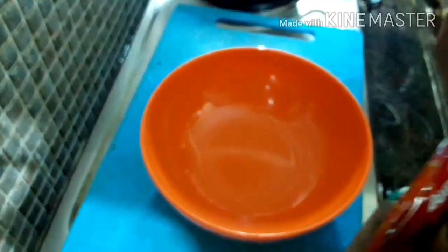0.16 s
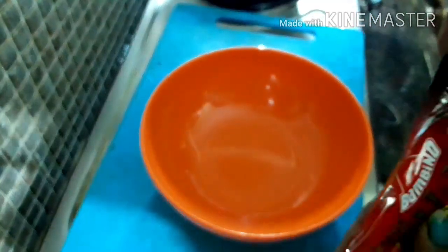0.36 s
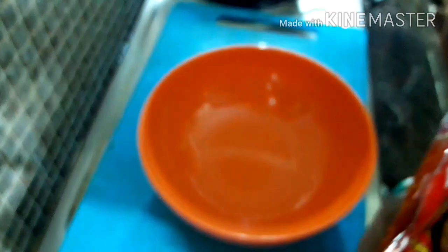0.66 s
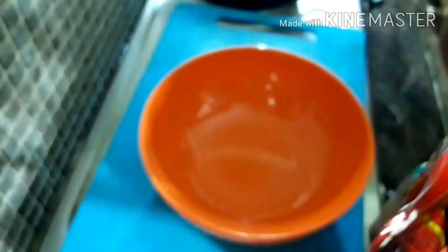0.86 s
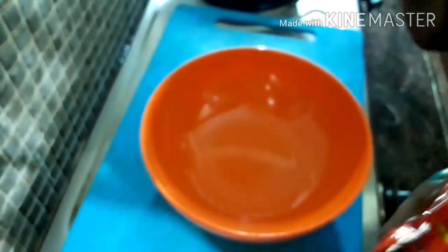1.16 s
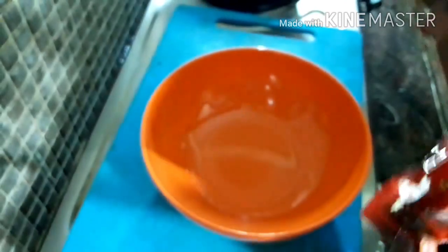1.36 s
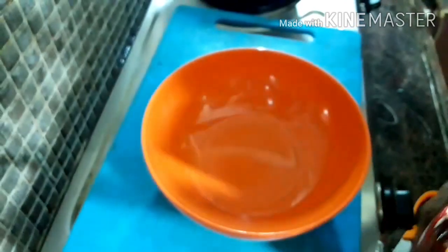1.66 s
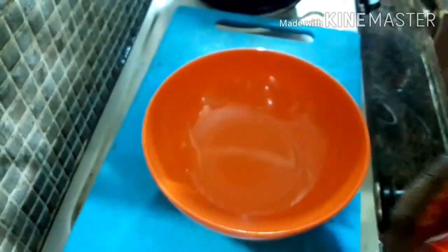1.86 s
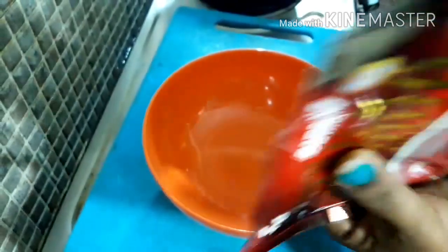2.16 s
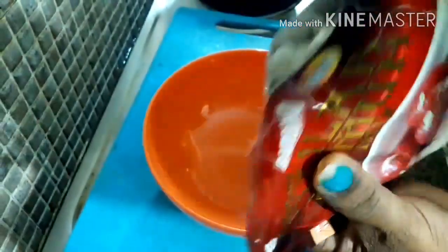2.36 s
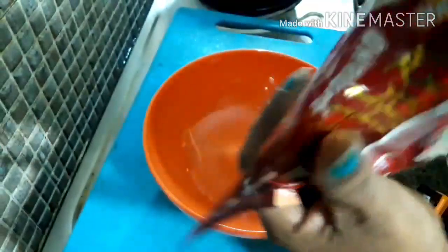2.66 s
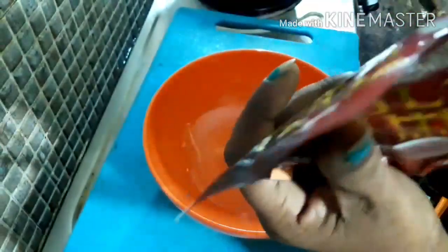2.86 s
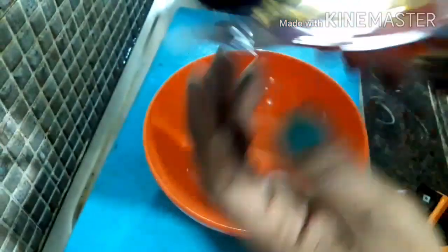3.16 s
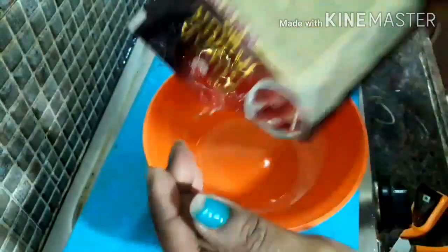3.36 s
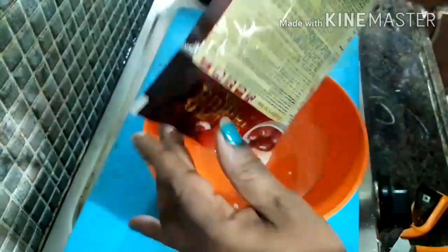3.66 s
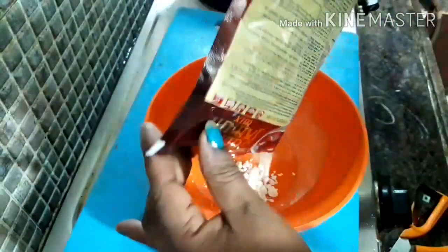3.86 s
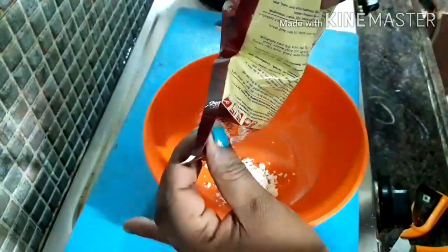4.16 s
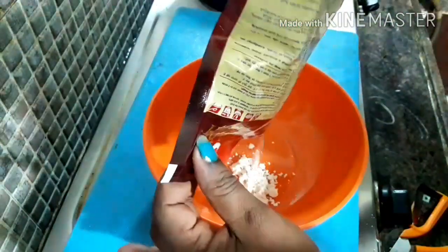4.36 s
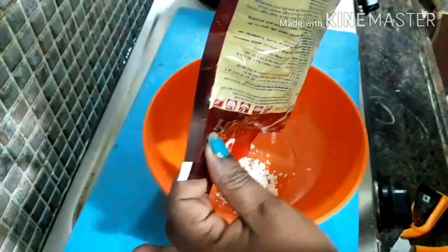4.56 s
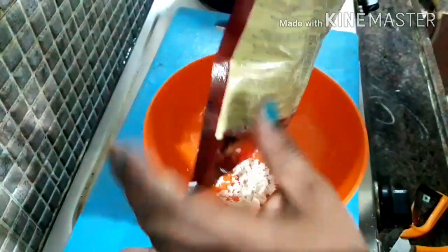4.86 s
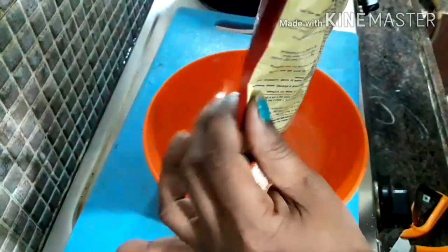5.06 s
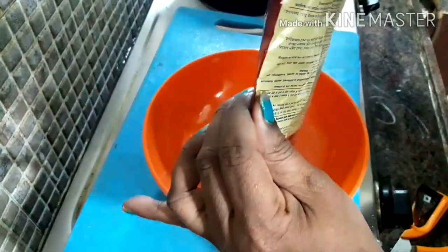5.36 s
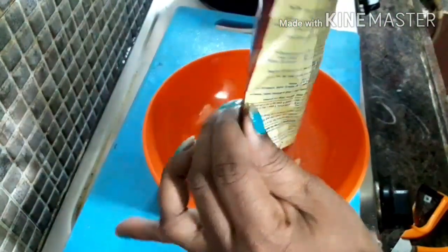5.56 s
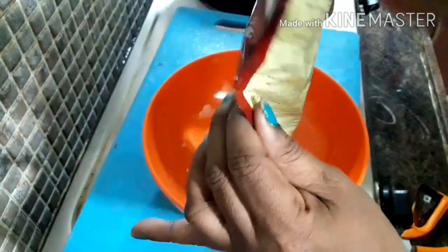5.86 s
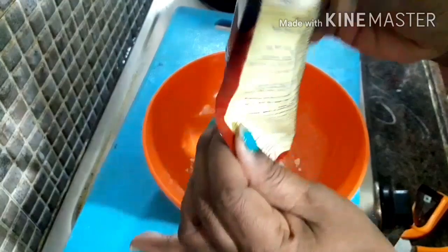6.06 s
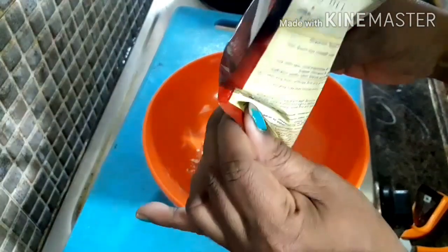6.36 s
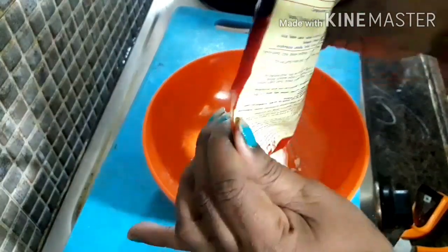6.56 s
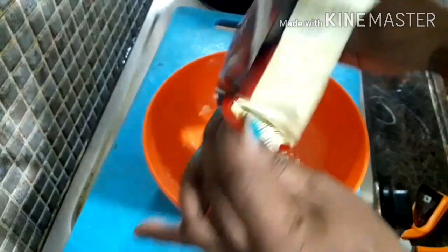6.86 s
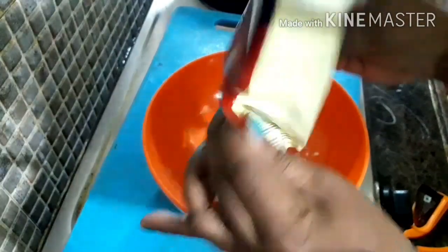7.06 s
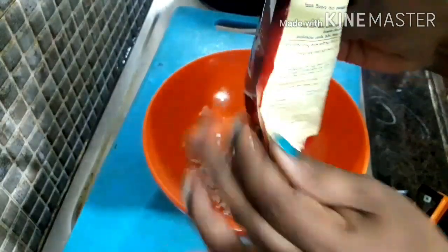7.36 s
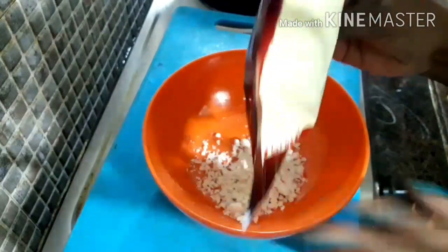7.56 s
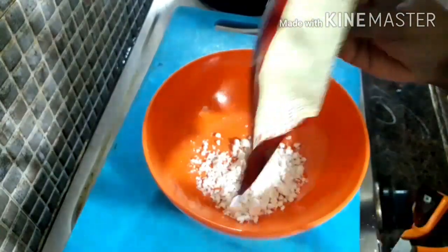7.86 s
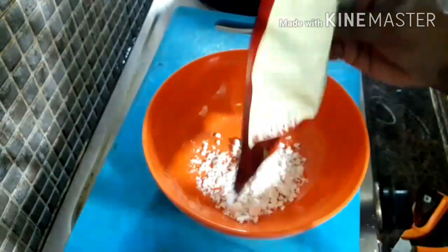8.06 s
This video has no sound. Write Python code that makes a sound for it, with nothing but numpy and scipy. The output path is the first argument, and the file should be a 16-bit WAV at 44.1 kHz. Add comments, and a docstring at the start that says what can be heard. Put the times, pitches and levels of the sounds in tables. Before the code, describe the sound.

A close mono pickup in a small, hard-surfaced kitchen with very faint air noise. After near quiet with slight hand rustle, a foil-lined packet creaks at 0.3 s and cracks brightly at 0.57-0.75 s, its seal ripping in two tiny bursts over low soft flops. A pause, then duller crinkles cluster at 1.2-1.5 s. A faint tap on the bowl at 1.8 s, a few crinkles near 2.1 s, then looser crackling from 2.7 to 3.5 s. At 3.87 s a lump of powder hits the plastic bowl with a hollow, low, quickly damped thud, and a soft low bump follows at 4.15 s. Crinkles stay sparse until 5 s, then snap at 5.1 and 5.3 s and thicken from 5.5 s. Crisp squeezing bursts peak at 6.3-7.4 s, with short echoes. It drops to near silence, with a slight bowl tap at 7.7 s and a soft flop and weak crinkle at 7.9 s.

```python
"""Crinkling packet over a plastic bowl

A foil-lined plastic packet is tugged open, then squeezed and shaken over a plastic bowl on a kitchen worktop.
Creases are bursts of tiny slips ringing the film; wrinkles and the tearing seal are random clicks.
The slack packet flops as short low notes. A lump of powder thuds into the bowl, which also takes lighter
knocks; both are sums of fading sines. Random echoes make a small hard room, with faint air noise, in mono.
"""
import sys
import numpy as np
from scipy import signal
from scipy.fft import rfft, irfft
from scipy.io import wavfile

SR = 44100
rng = np.random.default_rng(int(sys.argv[2]) if len(sys.argv) > 2 else 0)


def output_pcm(signal):
    """Save a mono or channel-first signal as 16-bit PCM at the path in sys.argv[1].

    Samples are clipped to [-1, 1] before scaling.
    """
    pcm = np.clip(np.atleast_2d(signal).T, -1, 1) * 32767
    wavfile.write(sys.argv[1], SR, np.round(pcm).astype(np.int16))


N = 361752

# the larger creases snapping through: start_s, panel_ring_db, crack_db (both over 5 ms), panel_pitch_hz
CREASES = [(0.3341, -36.5, -31.5, 2460), (0.518, -33.5, -33, 2200), (0.575, -29, -21, 2980),
           (0.5795, -20, -14, 2530), (0.667, -22, -16, 3840), (0.716, -30.5, -26.5, 3580),
           (0.74, -32, -29.5, 2980), (1.08, -36.5, -49, 2100), (1.198, -41, -57, 3200),
           (1.23, -30, -48, 2500), (1.2508, -31.5, -49, 1740), (1.2882, -32, -60, 2670),
           (1.359, -38, -64, 1740), (1.3837, -22, -35, 2640), (1.393, -30, -48, 2460),
           (1.4012, -32, -57, 2590), (1.408, -24.5, -39.5, 2630), (1.4277, -24.5, -44, 2820),
           (1.4524, -30, -34, 3200), (1.4572, -25.5, -38, 3000), (1.4956, -36, -36.5, 2750),
           (1.5019, -20, -44, 2530), (1.706, -48.5, -53.5, 1450), (2, -45, -51, 1970),
           (2.0977, -38.5, -42, 2520), (2.118, -27, -32, 3370), (2.192, -42.5, -46.5, 4020),
           (2.211, -41.5, -61, 2820), (2.6958, -36, -48, 3130), (2.784, -31, -44.5, 2130),
           (2.8157, -28, -51, 2160), (2.8286, -23, -40.5, 3500), (2.8629, -35, -52, 1960),
           (2.903, -39, -51, 3400), (2.913, -24, -58, 2660), (3.0172, -34.5, -47, 2970),
           (3.031, -28, -39.5, 2010), (3.0579, -27.5, -59, 1970), (3.0796, -33.5, -65, 2060),
           (3.109, -32, -64, 2340), (3.1281, -36, -45.5, 2930), (3.142, -29, -51, 2400),
           (3.169, -47, -56, 1990), (3.1909, -30.5, -47, 2300), (3.3901, -34, -63, 3740),
           (3.44, -25, -37, 3220), (3.493, -33, -52, 3070), (3.5148, -33.5, -45, 3080),
           (3.819, -28.5, -48, 2730), (3.9078, -34.5, -57, 3240), (3.959, -38, -65, 3700),
           (4.0422, -33.5, -58, 2370), (4.0719, -25.5, -30.5, 3270), (4.0875, -27.5, -37, 3000),
           (4.1, -33, -43, 3770), (4.128, -30.5, -43.5, 2130), (4.3188, -35.5, -67, 1300),
           (4.3972, -36, -52, 2700), (4.4957, -28.5, -40, 4160), (4.6008, -28, -43.5, 2450),
           (4.767, -40, -65, 1850), (4.9639, -39, -60, 2890), (5.0142, -25.5, -42, 2550),
           (5.0597, -32, -71, 2160), (5.092, -33.5, -71, 2360), (5.1234, -29.5, -50, 3000),
           (5.1275, -20.5, -37, 3050), (5.2498, -37.5, -53, 3900), (5.286, -19.5, -33, 3030),
           (5.4357, -34, -50.5, 4060), (5.471, -35.5, -66, 2440), (5.547, -34.5, -58, 2110),
           (5.5804, -24, -36.5, 2400), (5.617, -34, -49, 2200), (5.6261, -28.5, -54, 3280),
           (5.647, -36, -54, 2130), (5.6882, -30.5, -48, 2570), (5.7482, -25, -43, 3380),
           (5.7558, -26.5, -41, 3400), (5.791, -28.5, -42, 2900), (5.9023, -20.5, -36, 2400),
           (5.9205, -46, -48, 3000), (5.9353, -25, -47, 2450), (5.953, -27.5, -38.5, 3700),
           (5.9803, -23.5, -39.5, 3500), (6.131, -34, -76, 2430), (6.1735, -36, -60, 1940),
           (6.197, -28, -36, 3200), (6.2986, -36, -59, 2220), (6.326, -35, -40, 2760),
           (6.3525, -27, -43, 1540), (6.3657, -25.5, -37, 2600), (6.465, -29, -58, 2260),
           (6.474, -18.5, -33, 2600), (6.507, -43, -58, 2710), (6.5417, -27.5, -56, 2770),
           (6.547, -20, -34, 3180), (6.5545, -24.5, -39, 2900), (6.5796, -26, -41, 2780),
           (6.698, -39, -60, 3060), (6.705, -26, -44.5, 2280), (6.7433, -31, -45, 2720),
           (6.7499, -30.5, -31, 2420), (6.7794, -28, -52, 2540), (6.7862, -29, -45, 2410),
           (6.7924, -22.5, -40, 1800), (6.896, -28.5, -55, 2780), (6.919, -25.5, -43, 2300),
           (6.9309, -28.5, -50, 2290), (6.9518, -19.5, -30, 2900), (6.9607, -29, -40, 2740),
           (7.0841, -25.5, -46, 2600), (7.0902, -28.5, -32.5, 2980), (7.0963, -31, -54, 2280),
           (7.142, -25.5, -42.5, 2330), (7.2166, -33, -60, 1740), (7.236, -27, -37.5, 2700),
           (7.284, -27.5, -47, 2580), (7.294, -27.5, -37.5, 2430), (7.3566, -30.5, -55, 2820),
           (7.3717, -27, -35.5, 2130), (7.4215, -28, -50, 2180), (7.8822, -49.5, -66, 2370)]
# tone colour of the ringing film: frequency_hz, relative_level_db
FILM_COLOUR = [(150, 1.5), (800, 0.5), (1200, 2), (1900, 0), (2800, 2), (4200, -3), (6000, -10.5),
               (12000, -49.5)]
# tone colour of the bright crack: frequency_hz, relative_level_db
CRACK_COLOUR = [(2000, -42), (3800, -5), (5200, 3.5), (8000, 3.5), (11000, -1), (15500, -6)]
# a crease creeps with a small tick before it snaps: average lead time, level against the panel
CREEP_S, CREEP_DB = 0.006, -21
# small facets of freed film: level against the panel
FACET_DB = 4.5


def snaps(panel_q=3.0, ragged=1.0, rise_s=0.00066, buckle_db=0, room_q=1.66, size=2048):
    """Creases buckle with one pop and a quick run of slips that ring a panel of film and radiate a bright crack.
    Returns the sound towards the microphone and the smoother average that goes out into the room."""
    out = np.zeros((2, N + size))
    t = np.arange(size) / SR
    film, crack = response(FILM_COLOUR), response(CRACK_COLOUR)
    for start_s, panel_db, crack_db, hz in CREASES:
        # taut film cracks brighter and runs on for longer; slack film has more loose facets
        taut = tautness(panel_db, crack_db)
        run_s = 0.00086 + 0.0063 * taut
        reach_hz = min(9500 + 9000 * taut ** 2, SR * .45)
        panel = unit(resonate(film, hz, panel_q)) + undb(FACET_DB) * (1 - taut) * facets(film, hz)
        ring = unit(panel) * undb(panel_db)
        edge = unit(signal.lfilter(*signal.butter(2, reach_hz, fs=SR), crack)) * undb(crack_db)

        push, scatter = rng.standard_normal((2, size))
        run = np.exp(ragged * scatter - (t / run_s) ** 0.66)
        slips = unit(push * run * (1 - np.exp(-t / rise_s)))
        # the slacker the film, the more of its strain goes in a single buckle
        slips[int(rise_s * SR)] += undb(buckle_db) * (1 - taut)

        i = int(start_s * SR)
        for part in (ring, edge):
            # keep each part's own energy after the slips have roughened it
            out[0, i:i + size] += unit(convolve(slips, part)) * np.sqrt(np.sum(part ** 2))
        out[1, i:i + size] += unit(resonate(film, hz, room_q)) * undb(panel_db) + edge

        early = i - int(CREEP_S * (.5 + rng.random()) * SR)
        out[:, early:early + size] += undb(panel_db + CREEP_DB) * (1 - taut) * facets(film, hz)
    # turn energy into loudness over 5 ms
    return np.sqrt(.005 * SR) * out[:, :N]


def tautness(panel_db, crack_db):
    """How taut the film is, 0-1: taut film gives more crack for its ring."""
    return np.clip((crack_db - panel_db + 5.0) / 16, 0, 1)


def facets(film, hz, count=4, q=10.7, spread_octaves=0.456):
    """Small facets of film ring as a few sharp resonances scattered round the panel's pitch."""
    pitches = hz * 2 ** (spread_octaves * rng.standard_normal(count))
    return unit(sum(resonate(film, pitch, q) for pitch in pitches))


# squeezes of the packet, each a run of fine crackle: start_s, length_s, effort_db
SQUEEZE_ROWS = [(0.34, 0.17, -60), (1.39, 0.048, -39), (2.49, 0.2, -62), (2.72, 0.074, -50.5),
                (3.04, 0.16, -41), (3.43, 0.28, -49.5), (4.07, 0.083, -43.5), (4.37, 0.13, -46.5),
                (4.49, 0.054, -38.5), (5.02, 0.19, -44), (5.3, 0.13, -45), (5.6, 0.13, -41),
                (5.88, 0.12, -38), (6.12, 0.079, -40.5), (6.35, 0.042, -38), (6.47, 0.096, -34),
                (6.735, 0.035, -29), (6.92, 0.024, -33.5), (7.09, 0.023, -29.5), (7.24, 0.25, -44),
                (7.55, 0.23, -59), (7.95, 0.06, -60)]
SQUEEZE_ATTACK_S, SQUEEZE_T60_S = 0.0018, 0.14


def squeezing():
    """Effort of the squeezes, each building, holding and letting go, plus the resting film's faint stirring."""
    return strokes(SQUEEZE_ROWS, SQUEEZE_ATTACK_S, SQUEEZE_T60_S) + stir()


def stir(resting_db=-76.5, spread_db=5.5, pace_s=0.19):
    """Effort of the resting film, which wanders slowly between random values."""
    times = np.arange(0, N / SR, max(pace_s, .02))
    wander = np.interp(np.arange(N) / SR, times, rng.standard_normal(len(times)))
    return undb(resting_db + spread_db * wander)


# tone colour of the wrinkles: frequency_hz, relative_level_db
WRINKLE_COLOUR = [(200, -12.5), (600, 5), (1100, 2.5), (2700, 3), (4200, 1.5), (6500, -3.5), (15500, -26)]


def wrinkles(effort, crackle_db=-2, rub_db=-29, rub_slope=0.57, count=8, q=3.5):
    """Tiny wrinkles pop at several pitches over the rasp of film and powder sliding; a gentle touch mostly rasps."""
    colour = response(WRINKLE_COLOUR)
    pitches = np.geomspace(950, 4500, count)
    pops = sum(resonate(grains(34, 6.5, 14.1), hz, q) for hz in pitches)
    pops = unit(convolve(pops, colour)) * np.sqrt(N)
    rub = convolve(grains(4000, 0.94, 7.2), colour)
    # the rasp grows more slowly with effort than the pops do
    return undb(crackle_db) * (pops * effort + undb(rub_db) * rub * effort ** rub_slope)


# tugs that rip the seal: start_s, length_s, level_db
TUG_ROWS = [(0.578, 0.07, -36), (0.7, 0.055, -39)]
TUG_ATTACK_S, TUG_T60_S = 0.008, 0.085


def tear():
    """The seal rips open in a dense, bright run of tiny breaks."""
    breaks = convolve(grains(1900, 12, 28), response(CRACK_COLOUR))
    return breaks * strokes(TUG_ROWS, TUG_ATTACK_S, TUG_T60_S)


# soft flops of the packet and bumps of the hand: start_s, level_db, pitch_hz, fade_by_60_db_s
FLOP_ROWS = [(0.429, -41, 68, 0.22), (0.495, -37, 75, 0.13), (0.587, -39, 85, 0.12), (0.671, -33, 272, 0.2),
             (1.498, -35.5, 173, 0.034), (3.37, -42, 276, 0.14), (3.438, -36, 267, 0.066),
             (3.554, -47, 263, 0.13), (3.668, -36, 192, 0.032), (3.816, -31.5, 150, 0.12),
             (4.146, -26, 108, 0.084), (5.626, -35, 258, 0.065), (6.602, -28, 335, 0.023),
             (6.627, -37, 292, 0.072), (7.887, -40, 115, 0.08)]
# the hands shifting their grip: start_s, length_s, level_db
GRIP_ROWS = [(0.08, 0.042, -64.5), (0.42, 0.18, -55.5), (0.83, 0.071, -57), (1.18, 0.35, -56),
             (3.2, 0.068, -56), (3.41, 0.017, -50), (3.775, 0.04, -50.5)]
GRIP_ATTACK_S, GRIP_T60_S = 0.013, 0.23
# tone colour of the rustle: frequency_hz, relative_level_db
RUSTLE_COLOUR = [(25, -41), (60, -12), (100, -10.5), (280, -6), (520, -1), (800, -12.5), (1600, -57)]
# rustle of squeezing hands: level at an effort of 1, and dB of rustle per dB of effort
SQUEEZE_RUSTLE_DB, RUSTLE_SLOPE = -30.5, 0.66


def hands(effort, flutter=0.77, droop=0.3, droop_s=0.0062, length_s=0.62, count=7):
    """The slack packet flops with short low notes that droop in pitch, and rustles as the hands shift."""
    t = np.arange(int(length_s * SR)) / SR
    out = np.zeros(N + len(t))
    # this clock starts fast and slows to normal, so each note starts sharp
    clock = t + droop * droop_s * (1 - np.exp(-t / droop_s))
    for start_s, db, hz, t60 in FLOP_ROWS:
        noise = resonate(rng.standard_normal(len(t)), hz, 0.69)
        wobble = unit(resonate(noise, hz, 0.69)) * np.sqrt(len(t))
        note = np.sin(2 * np.pi * hz * clock) + flutter * wobble
        i = int(start_s * SR)
        out[i:i + len(t)] += undb(db) * note * fade(t, t60) * (1 - np.exp(-t / 0.0021))
    flops = signal.lfilter(*signal.butter(2, 50, "high", fs=SR), out[:N])

    # folds of many sizes bump, each at its own pitch
    folds = sum(resonate(grains(35, 9.3, 14), hz, 3.1) for hz in np.geomspace(80, 560, count))
    rustle = unit(convolve(folds, response(RUSTLE_COLOUR))) * np.sqrt(N)
    moving = undb(SQUEEZE_RUSTLE_DB) * effort ** RUSTLE_SLOPE
    moving = moving + strokes(GRIP_ROWS, GRIP_ATTACK_S, GRIP_T60_S)
    return flops + rustle * moving


# blows on the bowl: start_s, ring_level_db (over the first 20 ms), contact_ms,
# ring_time_factor (no unit), pitch_factor (no unit, for the place struck)
BLOW_ROWS = [(1.7985, -40.5, 0.35, 0.5, 1.09), (2.4756, -41.5, 0.3, 0.23, 1.13),
             (2.984, -45, 0.18, 0.32, 1.2), (3.8685, -20, 2.6, 1, 1.04), (4.069, -37, 1.2, 0.32, 1.02),
             (4.266, -44, 0.31, 0.49, 1.08), (5.667, -40, 0.15, 0.24, 1.19),
             (7.209, -47.5, 0.3, 0.33, 1.06), (7.694, -51, 4.2, 0.38, 1.27),
             (7.7346, -40.5, 0.54, 0.35, 1.1)]
# the bowl's own notes, before each blow's factors: pitch_hz, relative_level_db, fade_by_60_db_s
BOWL_MODES = [(106, -10.5, 0.24), (206.6, 3.5, 0.2), (258, -5.5, 0.26), (458.6, 6.5, 0.075),
              (520, 0.5, 0.086), (660, 2.5, 0.044), (1080, -2, 0.032), (1270, -17, 0.076)]


def bowl(length_s=.5, tick_db=-24, sag=14):
    """Blows ring the bowl: a longer contact sounds duller, and a heavy one sags in pitch as the bowl settles."""
    t = np.arange(int(length_s * SR)) / SR
    out = np.zeros(N + len(t))
    # the first swings are the largest, then the board grips the bowl
    grip = .45 + .55 * np.exp(-(t / .016) ** 3)
    for start_s, db, contact_ms, ring, pitch in BLOW_ROWS:
        clock = pitch * np.cumsum(1 / (1 + sag * undb(db) * t)) / SR
        blow = 0
        for hz, mode_db, t60 in BOWL_MODES:
            # the low modes push the air out as the higher ones draw it in
            direction = np.sign(350 - hz)
            push = direction * undb(mode_db) / (1 + (hz * contact_ms / 1000) ** 2)
            # each mode builds over about one cycle, so the lows come last
            swell = 1 - np.exp(-t * hz)
            blow = blow + push * swell * grip * fade(t, t60 * ring) * np.sin(2 * np.pi * hz * clock)
        # the briefer the contact, the stronger its tick
        tick = convolve(rng.standard_normal(len(t)) * fade(t, 0.042), response(FILM_COLOUR))
        tick = tick * undb(tick_db) / contact_ms ** 2
        i = int(start_s * SR)
        out[i:i + len(t)] += undb(db) * (blow / np.std(blow[:SR // 50]) + tick)
    return out[:N]


# the ring wavering after the big lump lands, level without flutter: time_s, pitch_hz, level_db
WAVER_PATH = [(3.911, 484, -60), (3.921, 530, -40), (3.932, 550, -41), (3.944, 610, -38), (3.958, 459, -42),
              (3.995, 453, -55)]


def waver(rough=0.71):
    """The bowl's upper ring wavers in pitch and flutters in level while the big lump settles."""
    time_s, hz, db = np.transpose(WAVER_PATH)
    t = np.arange(N) / SR
    tone = np.sqrt(2) * np.sin(2 * np.pi * np.cumsum(np.interp(t, time_s, hz)) / SR)
    flutter = unit(resonate(rng.standard_normal(N), 70, 0.71)) * np.sqrt(N)
    level = np.interp(t, time_s, undb(db), left=0, right=0)
    return tone * (1 + rough * flutter) * level


# tone colour of the room's echoes: frequency_hz, relative_level_db
ECHO_COLOUR = [(100, -8.5), (500, 4.5), (3000, -4), (7000, -2), (15000, -4)]


def kitchen(x, near_db=-7.0, near_t60=0.084, far_db=-9.0, far_t60=0.43, treble_t60=0.31, length_s=.6, size=6144):
    """Close echoes off bowl, worktop and wall, then the room's tail, in a new random pattern every 0.14 s."""
    t = np.arange(int(length_s * SR)) / SR
    out = np.zeros(N + 2 * size + len(t))
    close = fade(t, near_t60) * (t > .0018)
    tail, treble_tail = fade(t, far_t60), fade(t, treble_t60)
    lowpass, highpass = (signal.butter(2, 5000, kind, fs=SR) for kind in ("low", "high"))
    for i in range(0, N, size):
        early, low, high = rng.standard_normal((3, len(t)))
        # only a few scattered samples become close echoes
        near = unit(early * (rng.random(len(t)) < .04) * close)
        # the treble of the tail dies sooner
        far = signal.lfilter(*lowpass, low) * tail + signal.lfilter(*highpass, high) * treble_tail
        far = unit(far * np.clip(t / 0.014, 0, 1))
        room = undb(near_db) * near + undb(far_db) * far
        echoes = signal.fftconvolve(x[i:i + size], room)
        out[i:i + len(echoes)] += echoes
    # 1.085 lifts all the echoes slightly
    return 1.085 * convolve(out[:N], response(ECHO_COLOUR))


# tone colour of the faint room noise: frequency_hz, relative_level_db
AIR_COLOUR = [(30, -18.5), (130, -3), (580, -15), (850, -26.5), (2500, -19), (4100, -17.5), (15000, -28.5)]


def room_noise(level_db=-62.5):
    """The quiet room's air is steady noise, coloured by a filter."""
    return convolve(rng.standard_normal(N), response(AIR_COLOUR)) * undb(level_db)


def undb(db):
    """Decibels to gain."""
    return 10 ** (np.asarray(db) / 20)


def unit(x):
    """Scale to an energy of one."""
    return x / np.sqrt(np.sum(x ** 2) + 1e-20)


def fade(t, t60):
    """Exponential decay by 60 dB in t60 seconds."""
    return np.exp(-np.log(1000) * t / t60)


def strokes(rows, attack_s, release_t60):
    """Gain of gestures: each starts to rise at its start, is let go after its length and dies away."""
    t = np.arange(N) / SR
    gain = 0
    for start_s, length_s, db in rows:
        rise = np.clip((t - start_s) / attack_s, 0, 1)
        gain = gain + undb(db) * rise * fade(np.maximum(t - start_s - length_s, 0), release_t60)
    return gain


def grains(per_s, spread_db, ceiling_db):
    """Random clicks of rms 1, most of them small and a few large."""
    chance, size, sign = rng.random(N), rng.exponential(size=N), rng.choice([-1, 1], N)
    clicks = (chance < per_s / SR) * sign * undb(np.minimum(spread_db * size, ceiling_db))
    return unit(clicks) * np.sqrt(N)


def resonate(x, hz, q):
    """One resonance with gain 1 at its centre."""
    hz = min(hz, SR / 4)
    return signal.lfilter(*signal.iirpeak(hz, max(q, .5), fs=SR), x)


def response(points, size=2048):
    """Filter for a tone colour that acts as early as possible, found by folding its cepstrum; energy one."""
    hz, db = np.transpose(points)
    bins_hz = np.arange(size // 2 + 1) * SR / size
    log_gain = np.log(undb(np.interp(np.log(bins_hz + 1), np.log(hz), db)))
    cepstrum = irfft(log_gain)
    cepstrum[1:size // 2] *= 2
    cepstrum[size // 2 + 1:] = 0
    return unit(irfft(np.exp(rfft(cepstrum))))


def convolve(x, h):
    """Filter x by an impulse response, keeping its length."""
    return signal.fftconvolve(x, h)[:len(x)]


def scene(bowl_room_db=-12, hands_room_db=-6, crackle_room_db=-3):
    """Packet and bowl in the kitchen, over faint room noise; both channels alike."""
    direct, spread = snaps()
    effort = squeezing()
    crackle = wrinkles(effort) + tear()
    handling = hands(effort)
    blows = bowl() + waver()
    # each source sends its own share into the room
    to_room = spread + undb(crackle_room_db) * crackle
    to_room = to_room + undb(bowl_room_db) * blows + undb(hands_room_db) * handling
    mono = direct + crackle + blows + handling + kitchen(to_room) + room_noise()
    return np.array([mono, mono])


def record(dry, top_hz=15900):
    """Round the sharpest peaks softly, then cut the treble steeply above top_hz."""
    rounded = np.tanh(dry)
    return signal.sosfilt(signal.ellip(8, .2, 80, top_hz, fs=SR, output="sos"), rounded)


dry = scene()
out = record(dry)
output_pcm(out)
```